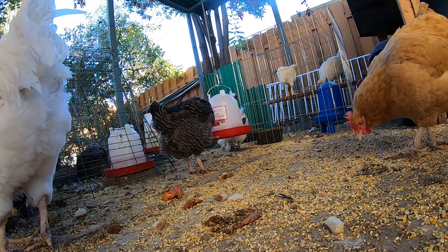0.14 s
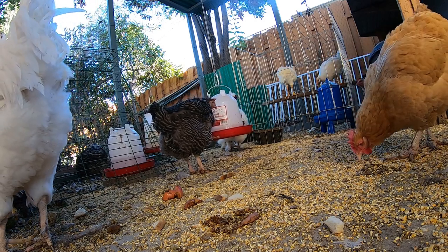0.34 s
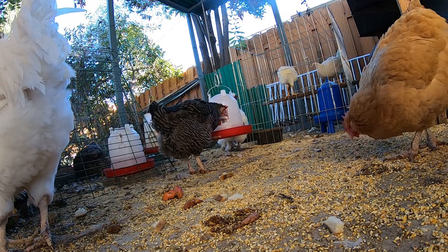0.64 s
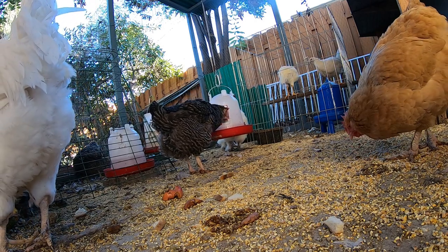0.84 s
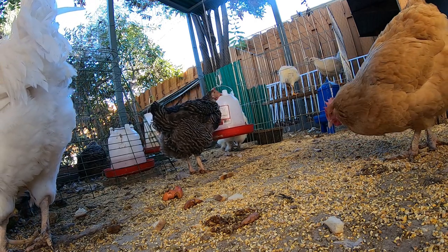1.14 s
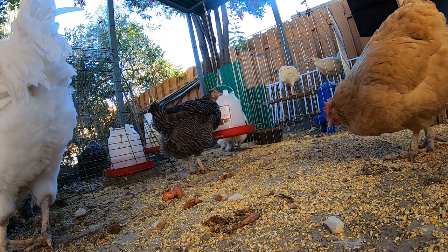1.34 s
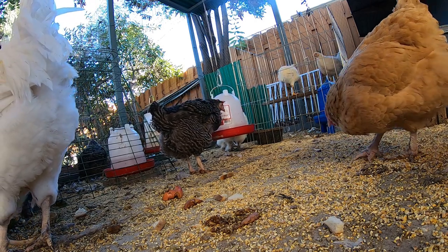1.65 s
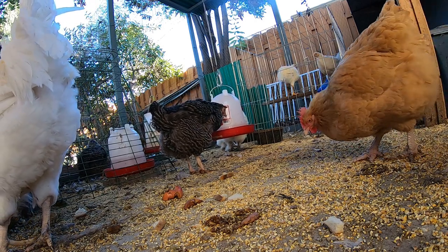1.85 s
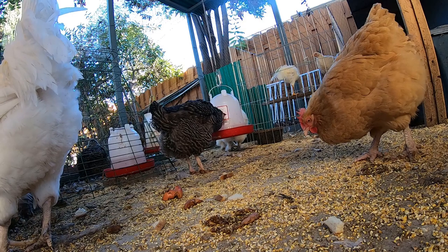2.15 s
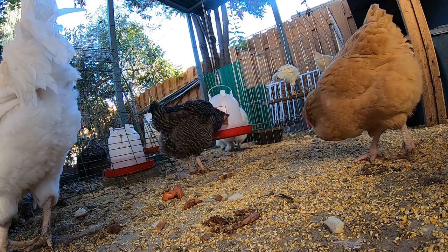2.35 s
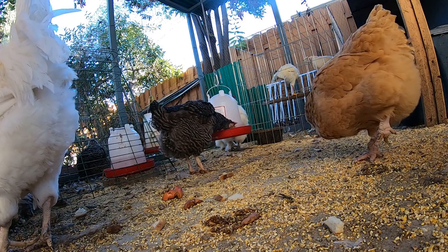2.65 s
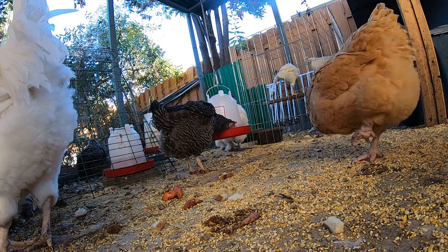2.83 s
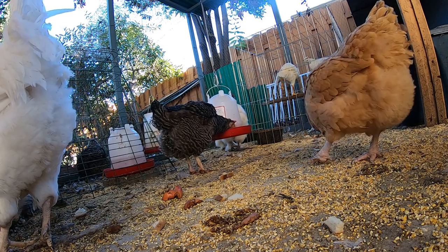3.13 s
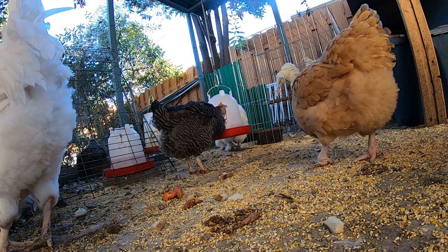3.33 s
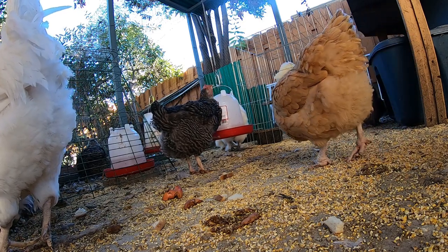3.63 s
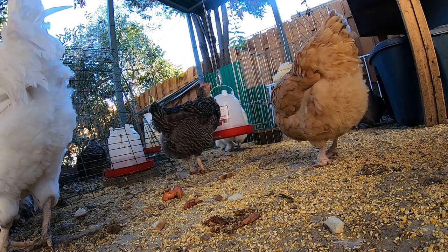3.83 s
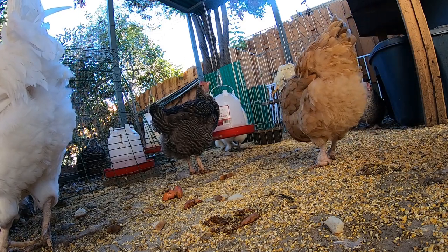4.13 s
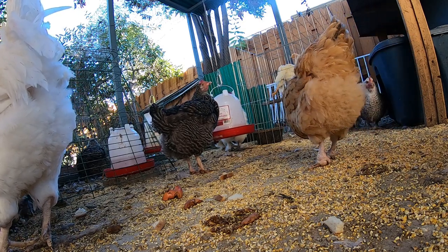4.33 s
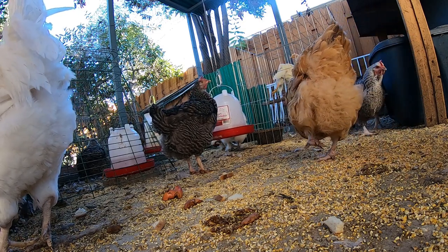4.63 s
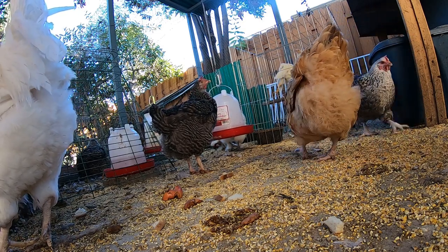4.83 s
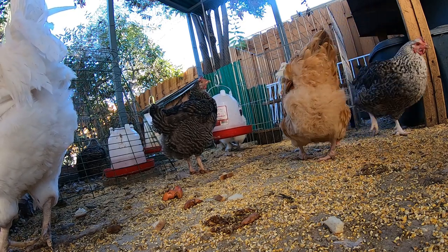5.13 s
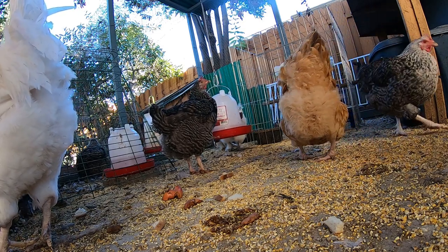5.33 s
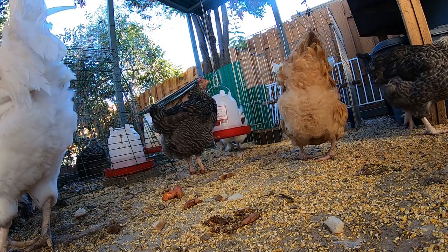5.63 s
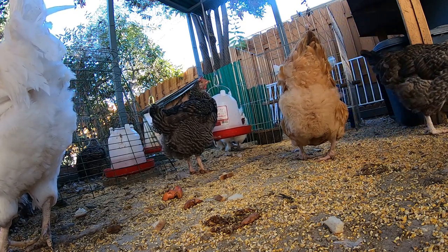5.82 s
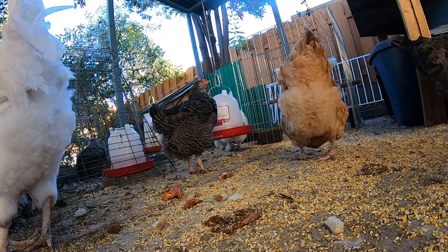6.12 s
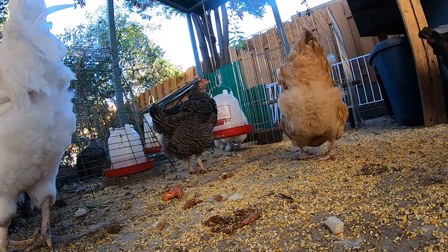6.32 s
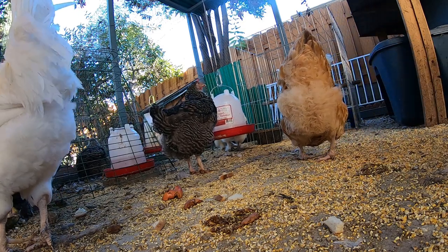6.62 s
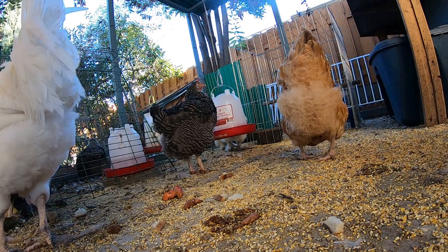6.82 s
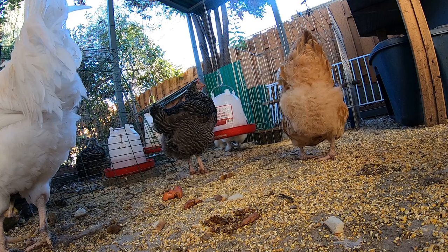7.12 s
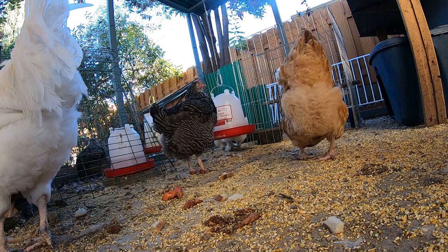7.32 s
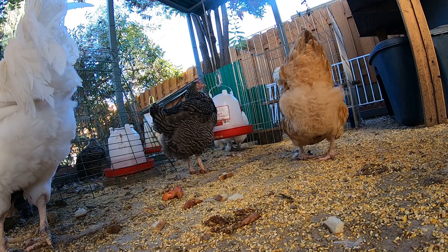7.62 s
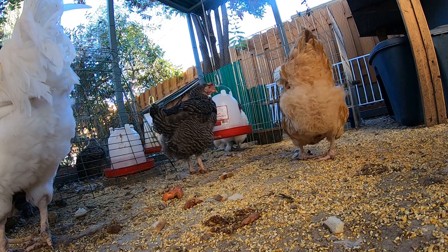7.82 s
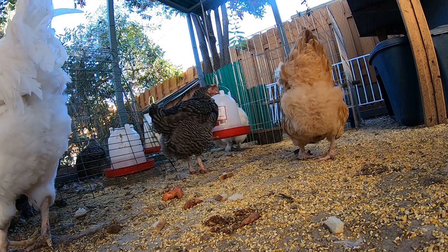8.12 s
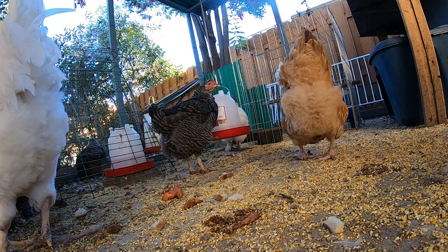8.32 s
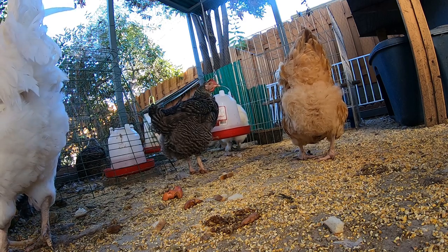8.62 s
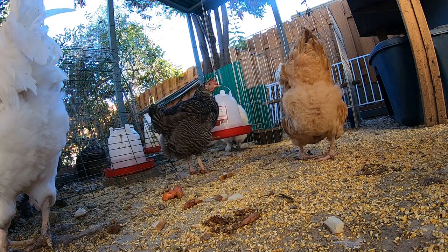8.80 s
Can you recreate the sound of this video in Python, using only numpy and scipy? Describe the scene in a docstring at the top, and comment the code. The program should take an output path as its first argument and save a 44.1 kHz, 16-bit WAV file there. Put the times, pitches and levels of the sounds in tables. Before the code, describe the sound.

Hens scratch and peck in dry litter, clucking softly over a low fan hum; midway a metal gate squeaks, slams with a boom and rattles.

```python
"""A fenced run: hens feed, heard from the ground. Feet swish through dry litter and scrape earth, beaks tick on grain:
all filtered noise, with ringing kernels, clods and hollows. A gate squeals (a wavering tone with overtones), grates
and slams: the latch clatters, the panel booms in a few low modes and the wire mesh shivers as grainy noise.
A hen clucks softly and small birds chirp (gliding tones); a fan hums in the faint hiss and rumble of the yard."""
import sys
import numpy as np
from scipy import signal
from scipy.fft import rfft, irfft, next_fast_len
from scipy.io import wavfile

SR = 44100
rng = np.random.default_rng(int(sys.argv[2]) if len(sys.argv) > 2 else 0)


def persist_wave(psi):
    """Save psi, clipped to +-1, as 16-bit WAV."""
    counts = np.round(np.clip(psi, -1, 1) * 32767).astype(np.int16)
    wavfile.write(sys.argv[1], SR, np.atleast_2d(counts).T)


N = 395136
TIME = np.arange(N) / SR
FAVOUR_OCTAVES = .28  # how widely a beak or a hinge favours the pitches around one frequency

# In all settings, t60 is the time in s that a sound takes to fall by 60 dB.


def undb(db):
    """Turn decibels into gain."""
    return 10 ** (np.asarray(db) / 20)


def unit(x):
    """Scale a sound to an rms of 1."""
    return x / np.sqrt(np.mean(x ** 2) + 1e-20)


def nearness(hz, centre_hz, octaves):
    """Bell curve over pitch: 1 at the centre, less with every octave away from it."""
    return np.exp(-(np.log2(hz / centre_hz) / octaves) ** 2 / 2)


def curve(rows):
    """Join (t/s, level/dB) rows into a gain over time, practically silent outside them."""
    s, db = np.transpose(rows)
    return undb(np.interp(TIME, s, db, left=-140, right=-140))


def bursts(rows, attack_s, t60):
    """Gain of (t/s, length/s, level/dB) bursts: each swells, holds for its length and dies away."""
    power = np.zeros(N)
    for s, length, db in rows:
        attack = np.clip((TIME - s) / attack_s, 0, 1)
        decay_db = -60 * np.clip((TIME - s - length) / t60, 0, 3)
        power += (attack * undb(db + decay_db)) ** 2
    return np.sqrt(power)


def colour(x, points):
    """Filter by a (f/Hz, level/dB) spectrum without pre-echo, keeping the power of white noise."""
    size = next_fast_len(len(x) + 2048) // 2 * 2
    hz, db = np.transpose(points)
    bins_hz = np.arange(size // 2 + 1) * SR / size
    log_gain = np.log(undb(np.interp(np.log(bins_hz + 1), np.log(hz), db)))
    # folding the cepstrum gives the filter that responds soonest (minimum phase)
    cepstrum = irfft(log_gain)
    cepstrum[1:size // 2] *= 2
    cepstrum[size // 2 + 1:] = 0
    response = np.exp(rfft(cepstrum))
    response_rms = np.sqrt(np.mean(abs(response) ** 2))
    return irfft(rfft(x, size) * response / response_rms)[:len(x)]


def band(x, hz, width_hz):
    """Let one resonance ring, with gain 1 at its centre."""
    return signal.lfilter(*signal.iirpeak(hz, hz / width_hz, fs=SR), x)


def tone(x, bass_db, treble_db, bass_hz=1400, treble_hz=5200, lowest_hz=130):
    """Raise or lower the bass and the treble, and thin out the deepest bass."""
    hz = np.arange(len(x) // 2 + 1) * SR / len(x)
    bass = bass_db / (1 + (hz / bass_hz) ** 4)
    treble = treble_db * (1 - 1 / (1 + (hz / treble_hz) ** 6))
    thin = hz ** 2 / (hz ** 2 + lowest_hz ** 2)  # small things radiate no deep bass
    return irfft(rfft(x) * undb(bass + treble) * thin, len(x))


def walk(rate, size=N):
    """Slow chance with a spread near 1, heading for a new random value `rate` times a second."""
    steps = rng.standard_normal(4096)
    return 1.2 * np.interp(np.arange(size) / SR * rate, np.arange(4096), steps)


def grains(size, spread_db):
    """Dense tiny impacts whose strength varies by chance every 16 samples."""
    chance = rng.standard_normal(size)
    draws = np.minimum(rng.exponential(size=size // 16 + 1), 6)
    strength = np.repeat(draws, 16)[:size]
    return unit(chance * undb(spread_db * strength))


def add(out, s, sound):
    """Mix a sound in at s seconds."""
    start = max(int(s * SR), 0)
    out[start:start + len(sound)] += sound[:N - start]


def strokes(rows, spectrum, settle_t60, bass_db, thinning, arch_db, grain_db, knock_db, knock_rate,
            jerk_db, husk_db, husk_flicker_db, patch_db, patch_q, husk_width_hz=110, size=32768):
    """A foot touches, drags and lifts, knocking kernels that settle after it; harder strokes sound thinner."""
    out, t = np.zeros(N), TIME[:size]
    for s, touch_db, length, end_db, treble_db, patch_hz in rows:
        middle_db = (touch_db + end_db) / 2 + arch_db
        db = np.interp(t, [0, length / 2, length], [touch_db, middle_db, end_db])
        db = db - 60 * np.maximum(t - length, 0) / settle_t60 + jerk_db * walk(106.5, size)
        knocks = (rng.random(size) < knock_rate / SR) * rng.uniform(-1.4, 1, size)
        force = grains(size, grain_db) + undb(knock_db) * unit(knocks)
        # husks and stalks ring in turn as the foot passes over them
        husks = np.zeros(size)
        for hz in np.geomspace(600, 5500, num=12) * rng.uniform(.9, 1.1, size=12):
            husks += band(force, hz, husk_width_hz) * undb(husk_flicker_db * walk(58.1, size))
        patch = band(force, patch_hz, patch_hz / patch_q)
        body = unit(force + undb(husk_db) * husks + undb(patch_db) * patch)
        body_db = bass_db - thinning * (max(touch_db, end_db) + 42)  # -42 dB is a usual stroke
        stroke = tone(colour(body, spectrum), body_db, treble_db)
        add(out, s, stroke * undb(db) * np.minimum(t / .001, 1))
    return out


# colour of dry litter: (f/Hz, relative level/dB)
LITTER_SPECTRUM = [(180, 0), (300, -5.5), (437, -8), (541, -11.5), (959, -10), (1540, -5), (2100, -3.5),
                   (2360, -4), (3670, -4), (5530, -8), (8600, -7.5), (10100, -14), (11500, -28),
                   (13800, -30), (15000, -40)]
# feet swish through dry litter: (t/s, level at first touch/dB, length of the drag/s, level at its end/dB,
# treble/dB, f at which this patch of ground rings/Hz)
LITTER_SWISHES = [(.62, -66, 0.15, -43.5, 1.5, 3120), (.768, -41, 0.0043, -28, -11.5, 2800),
                  (1.292, -34.5, 0.09, -38, -7, 2400), (1.765, -41, 0.081, -31, -9.5, 2400),
                  (3.66, -48, 0.034, -52.5, -1.5, 3380), (3.955, -43, 0.043, -55.5, -6, 1580),
                  (4.486, -47, 0.16, -53, 4.5, 2960), (5.183, -41.5, 0.11, -37, 1.5, 2640),
                  (5.802, -42.5, 0.023, -33.5, -0.5, 3900), (5.86, -45.5, 0.09, -49.5, 8, 3360),
                  (6.554, -45.5, 0.085, -36, 0.5, 2560), (7.141, -50, 0.024, -37, 2, 2900),
                  (7.19, -42, 0.039, -32, -2, 2950), (7.68, -55.5, 0.15, -54, 8, 3300),
                  (8.484, -43, 0.15, -46, 4, 3270)]


def swishes():
    """Feet drag through dry litter, whose loose husks ring in turn."""
    return strokes(LITTER_SWISHES, LITTER_SPECTRUM, settle_t60=0.19, bass_db=-1.0, thinning=0.34,
                   arch_db=0.5, grain_db=-0.5, knock_db=-16.0, knock_rate=290, jerk_db=1.0,
                   husk_db=-12.5, husk_flicker_db=9.5, patch_db=-3.5, patch_q=1.6)


# colour of packed earth: (f/Hz, relative level/dB)
EARTH_SPECTRUM = [(150, -11.5), (250, -4.5), (333, 6.5), (533, -3.5), (799, 0.5), (1180, -5), (1520, -3.5),
                  (1750, -12), (2470, -11), (3460, -19.5), (6340, -29), (8170, -25), (14000, -63)]
# claws dragged over packed earth: (t/s, level at first touch/dB, length of the drag/s, level at its end/dB,
# treble/dB, f at which this patch of ground rings/Hz)
EARTH_SCRAPES = [(.24, -50, 0.085, -60, -5, 1450), (1.1, -46, 0.08, -47, -9, 400),
                 (3.41, -39, 0.026, -33.5, 4, 1400), (6.83, -57, 0.088, -37.5, 6.5, 1560),
                 (7.39, -43.5, 0.17, -51.5, 1, 1550), (7.775, -43.5, 0.12, -42, -5, 1380),
                 (7.95, -45, 0.23, -75.5, -10, 1200), (8.345, -54, 0.081, -40.5, -1, 1450)]


def scrapes():
    """Claws drag over packed earth, which colours the noise darker than litter does."""
    return strokes(EARTH_SCRAPES, EARTH_SPECTRUM, settle_t60=0.23, bass_db=-9, thinning=0.025,
                   arch_db=3.5, grain_db=0.0, knock_db=-13.5, knock_rate=220, jerk_db=1.0,
                   husk_db=-9.5, husk_flicker_db=7.0, patch_db=-5, patch_q=1.7)


# beaks on grain: (t/s, level/dB, treble/dB)
BEAK_TICKS = [(.772, -38, -2), (1.2925, -22.5, -13.5), (1.3022, -22, -11), (3.007, -50, 9),
              (3.859, -48, 10.5), (3.984, -45, 2), (4.085, -43, 2), (4.243, -55, 12), (5.04, -36.5, 3),
              (5.102, -56, 15), (5.13, -39, -0.5), (6.446, -46.5, 8), (6.754, -40, 2.5), (7.078, -42, -14),
              (8.21, -42, -4)]


def pecks(t60=0.02, gain_db=1, size=2048):
    """A beak snaps on a kernel: one dry tick, dull or crisp."""
    out = np.zeros(N)
    for s, db, treble_db in BEAK_TICKS:
        tick = tone(colour(rng.standard_normal(size), LITTER_SPECTRUM), 4.1, treble_db)
        add(out, s, tick * undb(db + gain_db - 60 * TIME[:size] / t60))
    return out


# feet set down hard: (t/s, level/dB, thump: bass boost or cut/dB)
FOOT_STEPS = [(1.054, -39, 13.5), (1.139, -44, 6), (1.193, -39, 4), (1.662, -47, 11), (5.184, -38.5, 8),
              (5.23, -36, 1), (5.802, -40, 4), (6.556, -37, 0), (6.679, -38, -18), (6.8076, -34.5, 1.5),
              (6.969, -41, 3), (7.141, -43, -0.5), (7.340, -36.5, 0), (8.330, -39.5, 1.5), (8.937, -44, 7)]


def steps(t60=0.12, strike=4, thump_hz=480, size=8192):
    """A foot lands with one firm blow and a short crunch."""
    out = np.zeros(N)
    for s, db, thump_db in FOOT_STEPS:
        force = rng.standard_normal(size)
        force[0] += 2 * strike
        force = tone(force, thump_db, 0, bass_hz=thump_hz) * undb(db - 60 * TIME[:size] / t60)
        add(out, s, colour(force, EARTH_SPECTRUM))
    return out


# clods and kernels crack underfoot: (t/s, f/Hz, level/dB)
CLOD_CRACKS = [(1.12, 780, -37.5), (1.158, 640, -38), (5.039, 1930, -37.5), (5.131, 776, -40.5),
               (6.883, 1030, -32.5), (6.922, 1490, -35), (6.932, 2360, -36), (7.34, 1500, -37),
               (7.416, 1670, -32.5), (7.495, 1480, -34), (7.896, 1270, -32), (8.403, 1430, -34.5)]


def crunches(t60=0.029, q=16.0, crack_db=-5, gain_db=-1, size=4096):
    """A clod breaks in a short clump of grains, ringing at a pitch of its own."""
    out = np.zeros(N)
    for s, hz, db in CLOD_CRACKS:
        force = grains(size, 0.53) * undb(-60 * TIME[:size] / t60)
        # a narrow band passes little power, so make up for it
        ring = band(force, hz, hz / q) * np.sqrt(SR * q / (np.pi * hz))
        crack = undb(crack_db) * colour(force, EARTH_SPECTRUM)
        add(out, s, undb(db + gain_db) * (ring + crack))
    return out


# hollow pops as a foot closes on the ground: (t/s, length/s, start f/Hz, end f/Hz, level/dB)
HOLLOW_POPS = [(1.057, 0.0071, 625, 290, -37), (5.193, 0.016, 593, 190, -44), (5.801, 0.012, 810, 307, -40),
               (6.55, 0.022, 610, 240, -36), (6.808, 0.024, 804, 300, -47), (6.97, 0.051, 934, 520, -47),
               (7.466, 0.06, 1094, 794, -43.5), (7.763, 0.019, 885, 362, -44)]


def pops(rough=0.67, size=4096):
    """The hollow under a foot rings briefly while its pitch slides and settles."""
    out = np.zeros(N)
    for s, length, start_hz, end_hz, db in HOLLOW_POPS:
        u = np.minimum(TIME[:size] / length, 1)
        hz = end_hz * (start_hz / end_hz) ** ((1 - u) ** 2)
        ring = np.sin(2 * np.pi * np.cumsum(hz) / SR) * (1 + rough * walk(920, size))
        add(out, s, undb(db) * np.minimum(10 * u, 1) * (1 - u) * ring)
    return out


# soft thuds through the ground: (t/s, length/s, f/Hz, level/dB)
GROUND_THUDS = [(1.488, 0.14, 31.4, -36.5), (6.98, 0.066, 168, -30.5)]


def thuds():
    """The ground moves in a few slow cycles that swell and die."""
    out = np.zeros(N)
    for s, length, hz, db in GROUND_THUDS:
        size = int(length * SR)
        add(out, s, undb(db) * np.hanning(size) * np.sin(2 * np.pi * hz * TIME[:size]))
    return out


# the flock's shuffling over time, which also drives the rumble of the yard: (t/s, level/dB)
FLOCK_LEVEL = [(0.0, -69.5), (0.25, -58.5), (0.7, -55.5), (1.6, -60), (2.05, -66.5), (2.7, -66.5),
               (3.05, -55.5), (3.75, -58), (4.7, -61.5), (5.08, -54.5), (5.72, -62.5), (6.25, -61.5),
               (6.9, -55), (7.45, -54.5), (7.62, -64), (8.1, -58.5), (8.96, -63)]


def shuffle(gain_db=-3.0):
    """Many feet stir the litter at once: grainy noise that rises and falls with the flock."""
    stir = tone(colour(grains(N, 2.47), LITTER_SPECTRUM), 12.6, 0.12)
    return stir * curve(FLOCK_LEVEL) * undb(gain_db + 3.3 * walk(25))


# the hinge pin squeals: (t/s, f/Hz, level/dB)
HINGE_SQUEAL = [(2.445, 2640, -74), (2.47, 2654, -46.5), (2.5, 2675, -42), (2.544, 2680, -38),
                (2.605, 2676, -49), (2.634, 2662, -42), (2.68, 2704, -52.5), (2.708, 2790, -68)]


def squeal(overtone_db=-10, purify_db_per_s=60, third_db=-13, waver=0.0053, flutter_db=2):
    """The hinge pin sticks and slips in time with its resonance, ever purer; the pitch lifts as it lets go."""
    s, hz, db = np.transpose(HINGE_SQUEAL)
    wavering_hz = np.interp(TIME, s, hz) * (1 + waver * walk(250))
    phase = 2 * np.pi * np.cumsum(wavering_hz) / SR
    age = np.maximum(TIME - s[0], 0)
    overtones = np.sin(2 * phase) + undb(third_db) * np.sin(3 * phase)
    overtones = overtones * undb(overtone_db - purify_db_per_s * age)
    level = undb(flutter_db * walk(120)) * curve(list(zip(s, db)))
    return np.sqrt(2) * (np.sin(phase) + overtones) * level


# what the hinge rings with: (f/Hz, width/Hz, relative level/dB)
HINGE_MODES = [(1185, 40, 2), (1730, 99, -9), (1850, 680, -12.5), (2130, 67, -4.5), (2480, 66, -2.5),
               (5230, 46, -2), (5590, 49, -19)]
# the hinge grates: (t/s, length/s, level/dB, most strongly driven f/Hz)
HINGE_GRATES = [(2.482, 0.02, -44, 2000), (2.77, 0.057, -47, 1440), (2.845, 0.11, -43.5, 2500),
                (2.968, 0.054, -50.5, 2540)]


def grating(gain_db=8, favour_db=6, flicker_db=5.0):
    """As the gate speeds up the pin slips unevenly, and the hinge's resonances flare in turn."""
    out = np.zeros(N)
    for s, length, db, driven_hz in HINGE_GRATES:
        force = grains(N, 1.1) * bursts([(s, length, db)], attack_s=0.019, t60=0.045)
        for hz, width, mode_db in HINGE_MODES:
            favour = favour_db * nearness(hz, driven_hz, FAVOUR_OCTAVES)
            flare = undb(gain_db + mode_db + favour + flicker_db * walk(45))
            out += band(force, hz, width) * flare
    return tone(out, 0, -15, treble_hz=7500)


def blows(rows, t60, size=8192):
    """Make short bursts of contact noise from (t/s, level/dB) rows."""
    out = np.zeros(N)
    for s, db in rows:
        add(out, s, rng.standard_normal(size) * undb(db - 60 * TIME[:size] / t60))
    return out


# the latch strikes and chatters: (t/s, level/dB)
LATCH_STRIKES = [(3.0605, -23), (3.0652, -17), (3.0705, -19), (3.086, -21.5), (3.097, -27.5), (3.116, -34)]
# the ring of latch and wire: (f/Hz, width/Hz, relative level/dB)
LATCH_MODES = [(780, 27, 5), (1180, 17, -4), (2340, 22, -12), (3090, 54, 3.5), (3880, 140, -4),
               (4510, 66, -10), (4550, 63, -2), (5500, 61, 1), (5990, 56, 1), (5850, 80, -16),
               (7100, 31, -21)]
# colour of the crack of steel on steel: (f/Hz, relative level/dB)
CRACK_SPECTRUM = [(150, -49), (250, -18), (418, 7), (496, -15), (748, 1.5), (1070, -5), (1170, 5.5),
                  (3880, -3.5), (4220, -6), (4600, 3), (9770, -9.5), (14200, -42), (15000, -54)]


def latch(ring_db=9, crack_db=-1.5):
    """Steel strikes steel: a crack, and the ring of latch and wire."""
    force = blows(LATCH_STRIKES, t60=0.1)
    ring = sum(undb(db) * band(force, hz, width) for hz, width, db in LATCH_MODES)
    crack = colour(force, CRACK_SPECTRUM)
    return undb(crack_db) * crack + undb(ring_db) * tone(ring, 0, -26, treble_hz=10000)


# the gate panel's modes: (f/Hz, relative level/dB, t60/s)
PANEL_MODES = [(60.2, 8.5, 0.28), (91.8, 4, 0.44), (114.4, 3.5, 0.24), (161, 0, 0.17), (196, 0, 0.37)]
# the panel bumps against its post: (t/s, most strongly driven f/Hz)
PANEL_BUMPS = [(3.066, 124), (3.1014, 49), (3.191, 101), (3.255, 171), (3.298, 101), (3.464, 58),
               (3.561, 98), (3.604, 90)]


def panel(slam_db=-22, loss_db_per_s=34, push_s=0.0089, reach_octaves=0.81, rests_s=3.65, rest_t60=0.16,
          size=44100):
    """The heavy panel booms in low modes after ever weaker bumps, until it comes to rest on the post."""
    out, t = np.zeros(N), TIME[:size]
    for s, driven_hz in PANEL_BUMPS:
        bump_db = slam_db - loss_db_per_s * (s - PANEL_BUMPS[0][0])
        ring = np.zeros(size)
        for hz, db, t60 in PANEL_MODES:
            drive = nearness(hz, driven_hz, reach_octaves)
            ring += undb(db - 60 * t / t60) * drive * np.sin(2 * np.pi * hz * t)
        swing_up = 1 - np.exp(-(t / push_s) ** 2)
        add(out, s, undb(bump_db) * ring * swing_up)
    return out * undb(-60 * np.clip((TIME - rests_s) / rest_t60, 0, 2))


# the wire mesh is shaken: (t/s, length/s, level/dB)
MESH_SHAKES = [(3.09, 0.19, -34), (3.42, 0.021, -42)]


def mesh(gain_db=-1, surge_db=0.5, grain_db=2.1):
    """Wire mesh rattles on the shaken frame."""
    spectrum = [(60, -18), (200, 14.5), (350, 10.5), (700, 2.0), (2700, 3.0), (5000, -3.5),
                (9000, -7.5), (12000, -24.0), (15000, -34)]
    rattle = colour(grains(N, grain_db), spectrum)
    shaking = bursts(MESH_SHAKES, attack_s=0.0097, t60=0.99)
    return rattle * shaking * undb(gain_db + surge_db * walk(90))


def calls(rows, timbre, jitter, flutter_db, rasp, beak_db, break_at, break_share, break_span=0.13, count=10):
    """Harmonics glide on an unsteady pitch that breaks to the next note, shaped by throat and open beak."""
    out = np.zeros(N)
    throat_hz, throat_db = np.transpose(timbre)
    for s, length, start_hz, end_hz, db, beak_hz in rows:
        size = int(length * SR)
        u = np.linspace(0, 1, size)
        pitch_break = (1 + np.tanh((u - break_at) / break_span)) / 2
        glide = (1 - break_share) * u + break_share * pitch_break
        hz = (start_hz + (end_hz - start_hz) * glide) * (1 + jitter * walk(337, size))
        phase = 2 * np.pi * np.cumsum(hz) / SR
        voice = np.zeros(size)
        for k in range(1, count + 1):
            throat = np.interp(k * hz, throat_hz, throat_db)
            beak = beak_db * nearness(k * hz, beak_hz, FAVOUR_OCTAVES)
            voice += undb(throat + beak + flutter_db * walk(54.0, size)) * np.sin(k * phase)
        swell = (u * (1 - u)) ** 0.17
        roughness = 1 + rasp * walk(498, size)
        add(out, s, undb(db) * unit(voice * swell * roughness))
    return out


# hen clucks: (t/s, length/s, start f/Hz, end f/Hz, level/dB, f that the open beak favours/Hz)
HEN_CLUCKS = [(.043, 0.06, 234, 207.4, -38, 905), (.22, 0.074, 393, 417, -55, 800),
              (3.725, 0.046, 274, 321, -50.5, 296), (3.772, 0.11, 387, 575, -51, 410),
              (3.965, 0.086, 376.6, 663, -48, 394), (4.132, 0.097, 413, 658, -51.5, 910),
              (4.318, 0.072, 415, 612, -49.5, 900), (4.492, 0.048, 443, 612, -47.5, 915)]
# how the hen's throat shapes the harmonics: (f/Hz, relative level/dB)
HEN_THROAT = [(150, 19), (230, 15), (320, 9), (420, -0.5), (520, -7), (650, -1.5), (760, -5), (900, -4.5),
              (1050, -10), (1240, -4), (1400, -7.5), (1650, -10), (2300, -50), (5000, -60)]


def clucks():
    """A hen's voice: ten harmonics, roughened and shaped by the throat."""
    return calls(HEN_CLUCKS, HEN_THROAT, jitter=.03, flutter_db=2.5, rasp=.36, beak_db=6.0,
                 break_at=.62, break_share=0.713)


# small birds: (t/s, length/s, start f/Hz, end f/Hz, level/dB, f that the open beak favours/Hz)
BIRD_CHIRPS = [(.074, 0.052, 4000, 3430, -62.5, 3600), (.127, 0.031, 3020, 2530, -60, 2600),
               (1.17, 0.076, 3950, 3850, -61, 3800), (4.995, 0.16, 4700, 3010, -61, 3800),
               (5.55, 0.096, 3840, 3870, -67, 3900)]


def chirps():
    """Small birds sing a single high, rough, gliding tone without overtones."""
    return calls(BIRD_CHIRPS, [(4500, 6), (7000, -18)], jitter=0.014, flutter_db=3.0, rasp=0.44,
                 beak_db=3, break_at=.35, break_share=0.274, count=1)


def fan(hz=172, line_db=-50, drone_db=-51):
    """A slightly wavering blade tone sounds in the drone of its housing."""
    wavering_hz = hz * (1 + 0.00722 * walk(10.0))
    blade = np.sin(2 * np.pi * np.cumsum(wavering_hz) / SR) * undb(2 * walk(13))
    spectrum = [(90, -36.0), (120, -32.5), (145, -2.5), (175, 4.5), (205, -5), (245, -9),
                (300, -30.5), (450, -26), (900, -89)]
    drone = colour(rng.standard_normal(N), spectrum)
    return undb(line_db) * unit(blade) + undb(drone_db) * drone


def yard(wide_hz=600, air_db=-59.5, rumble_db=-75, tread_db=-6):
    """A wide, faint hiss of air lies over a low central rumble that grows as the flock treads the ground."""
    air_spectrum = [(100, 5.5), (300, 11.0), (520, -12), (780, -0.5), (1100, -10.5), (2000, -16.0),
                    (4000, -41), (9000, -28.0), (12000, -39.5), (15000, -52)]
    mid, side = (colour(rng.standard_normal(N), air_spectrum) for _ in range(2))
    side = signal.sosfilt(signal.butter(2, wide_hz, "high", fs=SR, output="sos"), side)
    air = (mid + 2.5 * np.array([side, -side])) * undb(air_db + 1.0 * walk(9.5))
    rumble_spectrum = [(10, -6), (30, -19), (60, 11.5), (110, 2.5), (250, 1), (1000, -76)]
    rumble = colour(rng.standard_normal(N), rumble_spectrum)
    tread = undb(rumble_db) + undb(tread_db) * curve(FLOCK_LEVEL)
    return air + rumble * tread * undb(1.2 * walk(25))


# how unlike the two ears are, before each sound's own width is added: (f/Hz, side minus mid/dB)
EAR_WIDTH = [(100, 0), (270, -26), (500, -7), (1000, -5), (2200, -7), (4000, -8), (8000, -1)]


def space(x, wet, width_db, t60=0.074, tail_t60=0.18, size=16384):
    """Early reflections make the ears unlike; the fence returns a late tail (wet sets its power)."""
    t = TIME[:size]
    fade = undb(-60 * t / t60) * (t > .0015)
    early, late = rng.standard_normal((2, size))
    early = early * fade
    for _ in range(4):  # many reflections even out the colour
        spectrum = rfft(early)
        early = irfft(spectrum / abs(spectrum)) * np.minimum(10 * fade, 1)
    hz, db = np.transpose(EAR_WIDTH)
    bins_hz = np.arange(size // 2 + 1) * SR / size
    width = undb(width_db + np.interp(np.log(bins_hz + 1), np.log(hz), db))
    late = unit(late * undb(-60 * t / tail_t60) * (t > .012)) * np.sqrt(wet / size)
    mid = x + signal.fftconvolve(x, late)[:N]
    side_response = irfft(rfft(early) * width)[:size // 2]
    side = signal.fftconvolve(mid, side_response)[:N]
    return np.array([mid + side, mid - side])


def scene(left_db=0.24, far_db=-2, near_db=-1.5):
    """Mix all sources; those scattered by the run are slightly louder on the left."""
    flock = swishes() + scrapes() + shuffle() + clucks() + chirps()
    far = space(flock, wet=0.13, width_db=2.0, t60=0.042)
    contacts = space(pecks() + steps() + crunches(), wet=0.085, width_db=2.5, t60=0.034)
    hinge = space(squeal() + grating(), wet=0.22, width_db=1)
    gate = space(latch(), wet=0.072, width_db=2.5, t60=0.048)
    gate = gate + space(mesh(), wet=0.12, width_db=2.0, t60=0.092)
    scattered = undb(far_db) * (far + gate) + undb(near_db) * (contacts + hinge)
    central = pops() + thuds() + panel() + fan()
    return scattered * undb([[left_db], [-left_db]]) + central + yard()


def record(dry, top_hz=15300):
    """A steep low-pass filter cuts the highest treble."""
    return signal.sosfilt(signal.ellip(12, .2, 80, top_hz, fs=SR, output="sos"), dry)


dry = scene()
out = record(dry)
persist_wave(out)
```